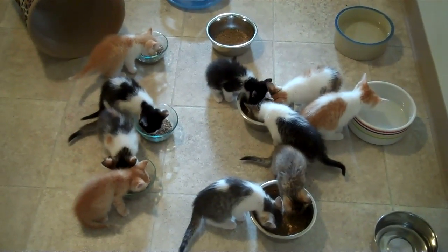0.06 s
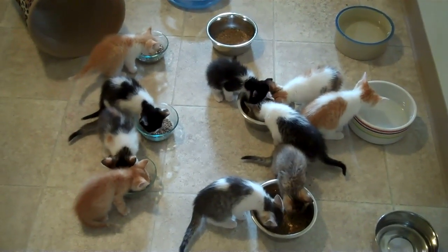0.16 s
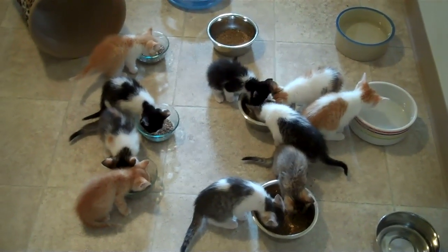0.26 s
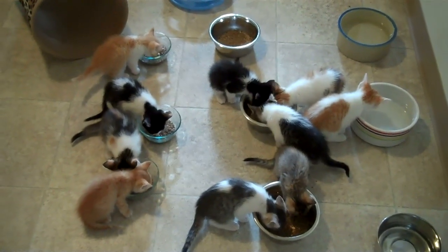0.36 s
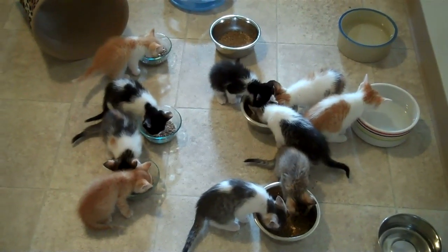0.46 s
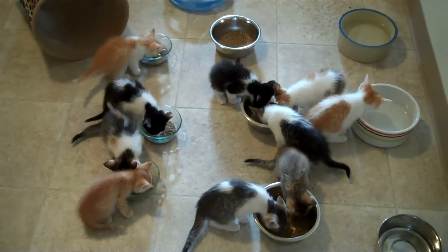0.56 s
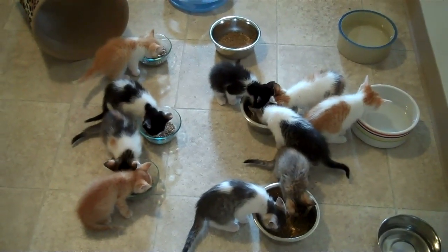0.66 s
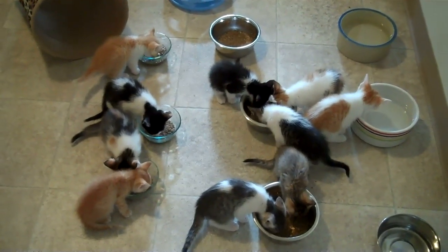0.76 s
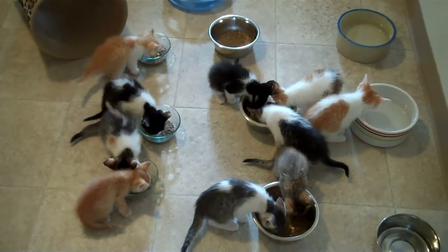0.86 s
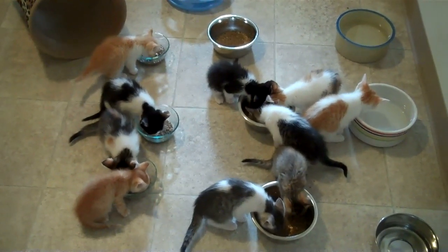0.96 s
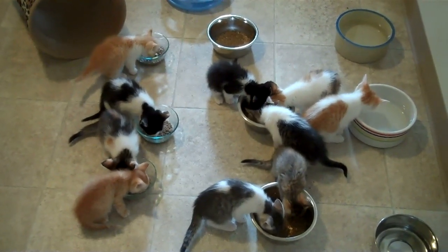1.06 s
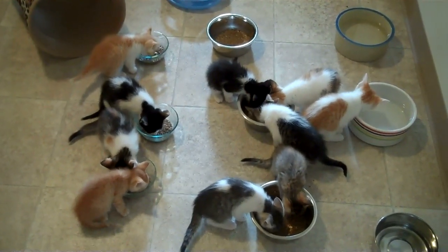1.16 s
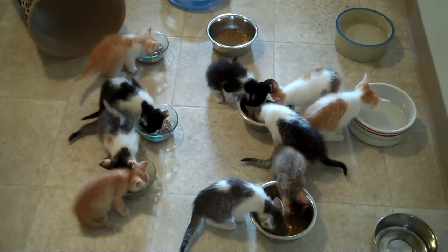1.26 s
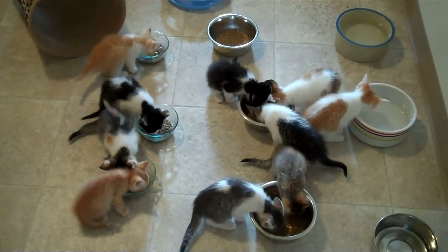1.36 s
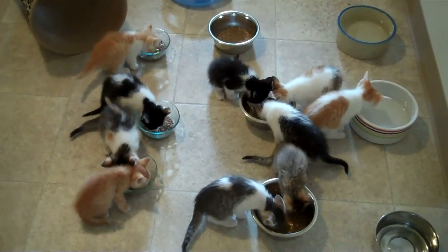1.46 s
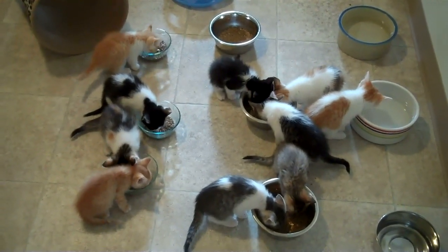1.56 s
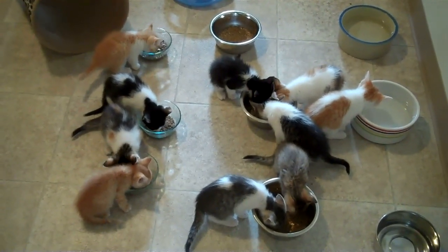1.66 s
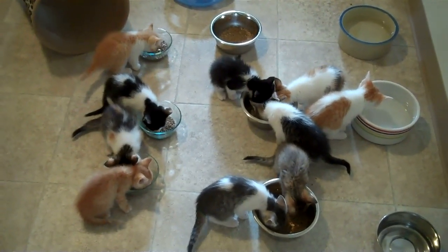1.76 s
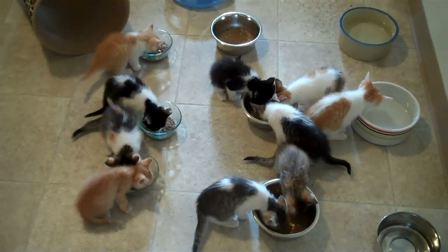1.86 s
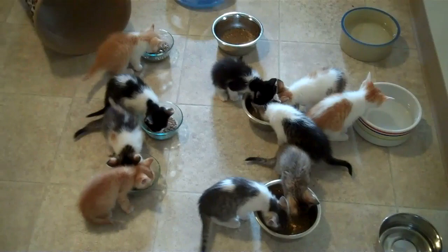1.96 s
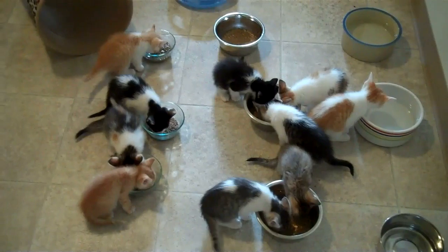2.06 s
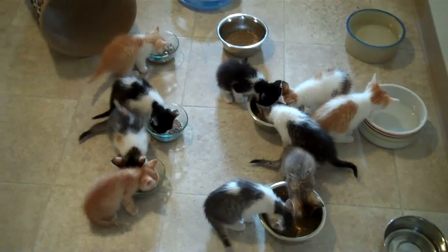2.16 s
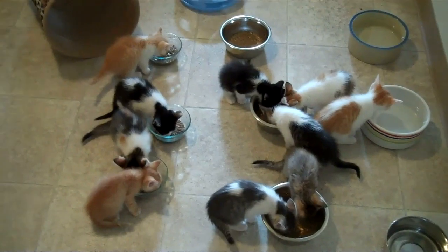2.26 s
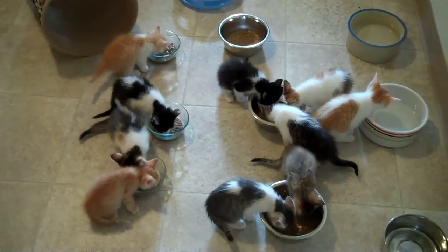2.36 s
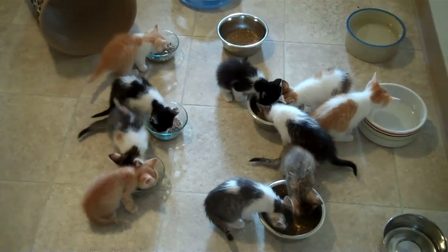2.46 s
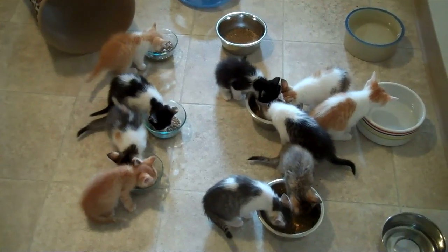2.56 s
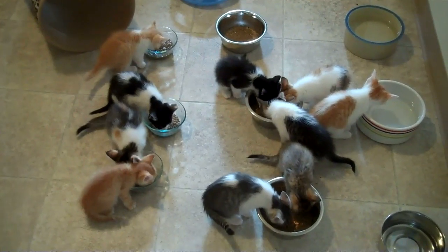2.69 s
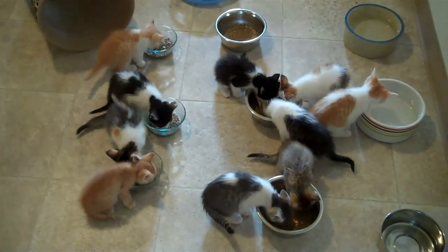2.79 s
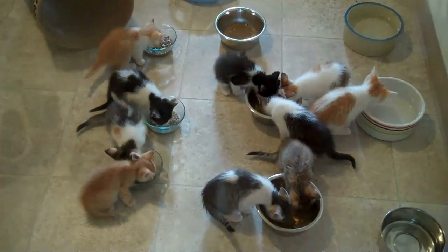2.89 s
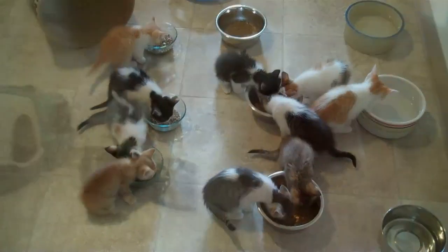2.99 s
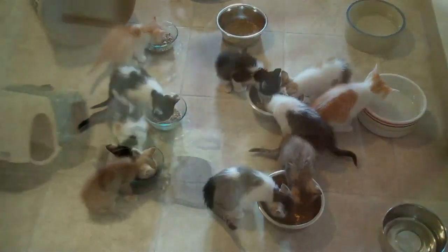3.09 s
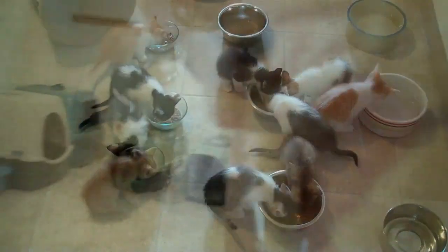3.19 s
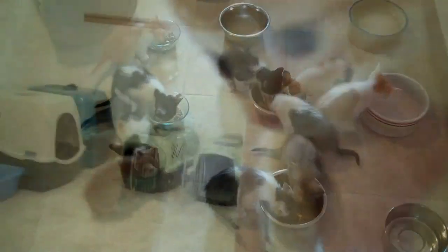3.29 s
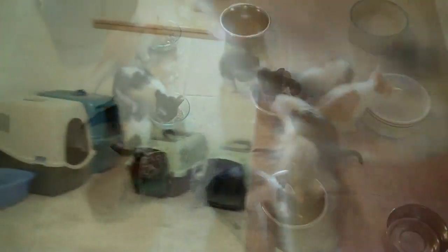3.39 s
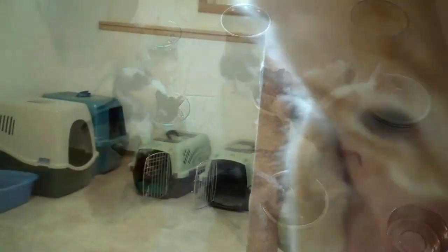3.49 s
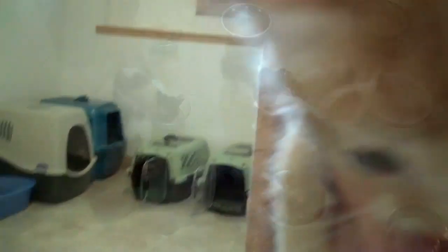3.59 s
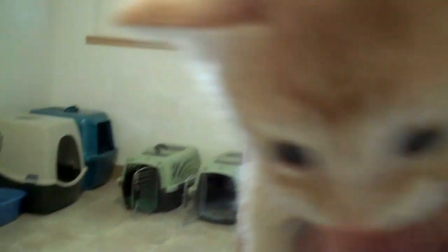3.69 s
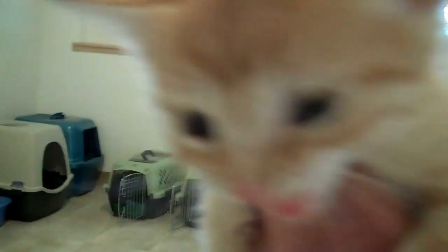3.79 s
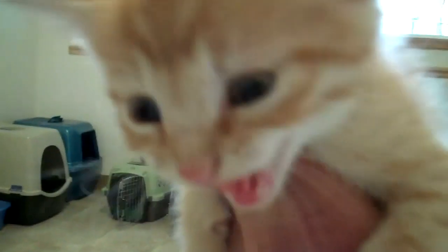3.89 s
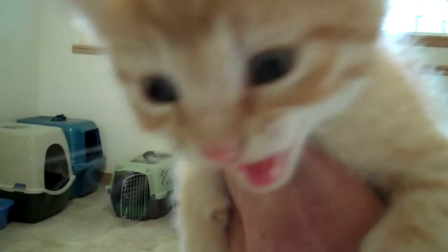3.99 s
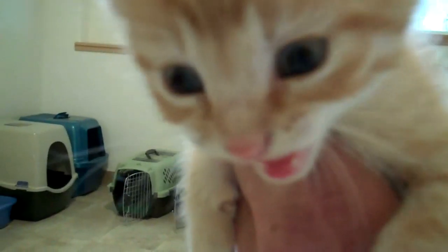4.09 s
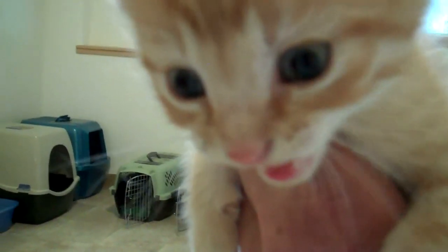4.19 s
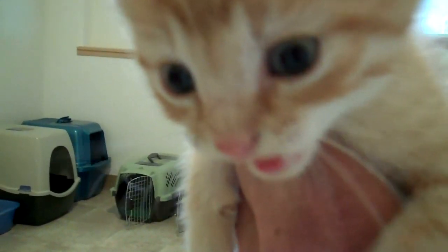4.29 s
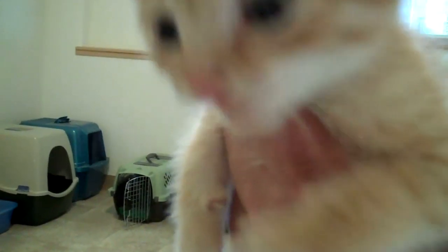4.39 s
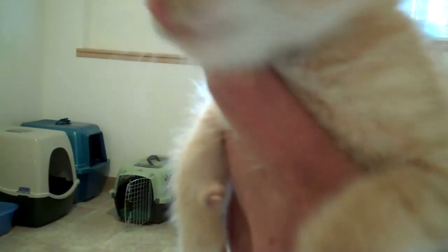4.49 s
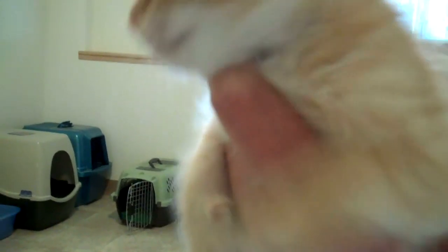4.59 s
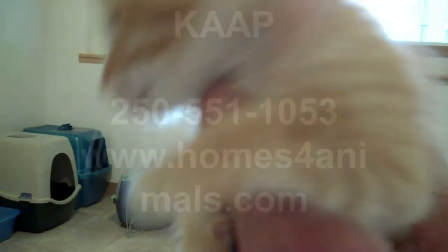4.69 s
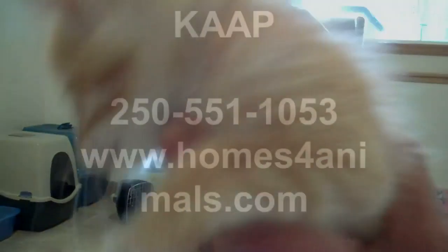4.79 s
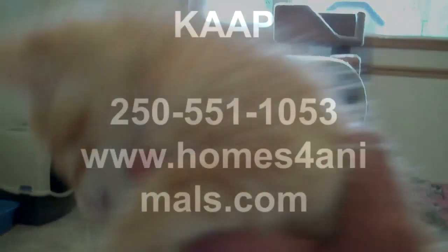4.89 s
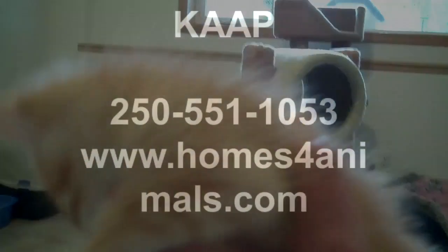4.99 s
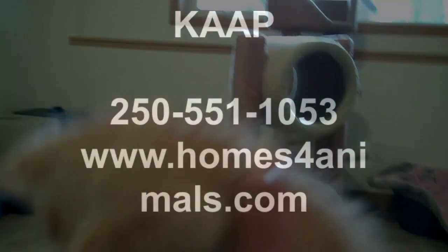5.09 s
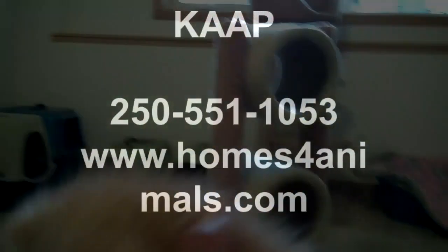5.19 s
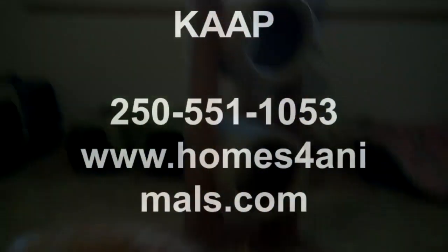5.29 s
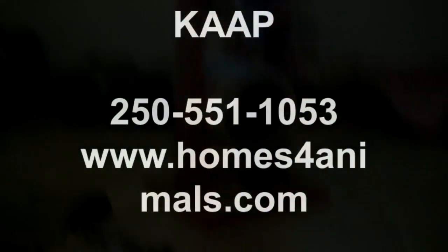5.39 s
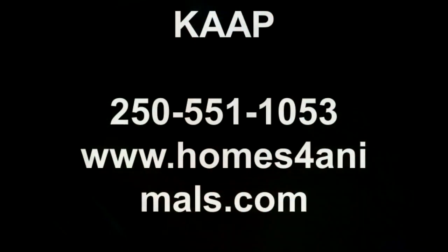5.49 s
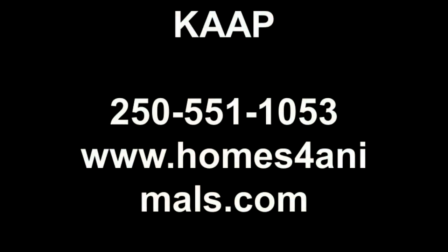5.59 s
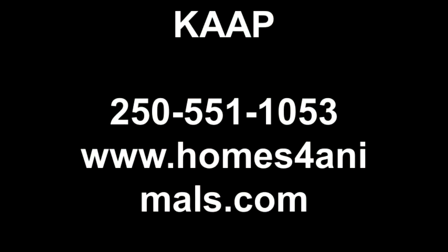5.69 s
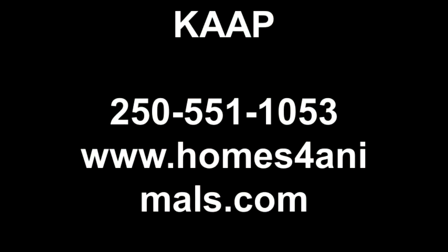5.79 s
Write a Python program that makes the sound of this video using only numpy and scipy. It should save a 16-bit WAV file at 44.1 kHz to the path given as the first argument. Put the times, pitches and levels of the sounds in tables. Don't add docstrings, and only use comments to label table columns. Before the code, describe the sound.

Several kittens crunch dry food from bowls in a tiled room, then one close kitten gives a shrill meow before everything fades out.

```python
import sys
import numpy as np
from scipy import signal
from scipy.fft import rfft, irfft, next_fast_len
from scipy.io import wavfile
from scipy.ndimage import uniform_filter1d, map_coordinates

SR = 44100
rng = np.random.default_rng(int(sys.argv[2]) if len(sys.argv) > 2 else 0)


def gain_from_db(level_db):
    decades = np.asarray(level_db, float) / 20
    return 10 ** decades


def master_out(mix):
    frames = np.transpose(np.atleast_2d(mix))
    ceiling = np.clip(frames, -1, 1)
    pcm = np.round(ceiling * 32767).astype(np.int16)
    wavfile.write(sys.argv[1], SR, pcm)


N = 257984
TIME = np.arange(N) / SR


def unit(x):
    return x / np.sqrt(np.mean(x ** 2) + 1e-20)


def along(points, hz):
    f, v = np.transpose(points)
    return np.interp(np.log(hz + 1), np.log(f + 1), v)


def curves(rows):
    s, *cols = np.transpose(rows)
    return [np.interp(TIME, s, c) for c in cols]


def gate(rows, edge_s):
    return np.clip(np.minimum(TIME - rows[0][0], rows[-1][0] - TIME) / edge_s, 0, 1)


def wobble(rate_hz, size=N):
    knots = rng.standard_normal(int(size * rate_hz / SR) + 4)
    return map_coordinates(knots, [TIME[:size] * rate_hz])


def filtered(x, response):
    m = next_fast_len(N + SR // 2)
    return irfft(rfft(x, m) * response(np.fft.rfftfreq(m, 1 / SR)), m)[..., :N]


def coloured(x, spectrum):
    return filtered(x, lambda hz: gain_from_db(along(spectrum, hz)))


def sides(left_db):
    return gain_from_db(left_db / 2 * np.array([[1], [-1]]))


def snap(hz, low_db, t60_s, sharp):
    t = np.arange(SR // 20) / SR
    noise = rng.standard_normal((2, len(t))) * gain_from_db(-60 * t / t60_s)
    noise[:, 0] += 2.5
    b, a = signal.iirpeak(hz, sharp, SR)
    high = signal.lfilter(b, a, signal.lfilter(b, a, noise[0]))
    dull = signal.butter(2, [1100, 3800], "band", fs=SR)
    low = signal.lfilter(*dull, noise[1])
    return high / abs(high).max() + gain_from_db(low_db) * low / abs(low).max()


def meow():
    # time in seconds, pitch in Hz, effort in dB, mouth opening in dB.
    humming = [
        (3.79, 581, -46.5, -10),
        (3.818, 601, -46.5, -9),
        (3.84, 695, -43.5, -7),
        (3.872, 708.6, -43.5, -2.5),
        (3.884, 774, -43.5, -2.5),
        (3.898, 930, -38, -1.5),
        (3.916, 1104, -35, 2),
        (3.934, 1188, -36.5, -0.5),
    ]
    cry = [
        (3.935, 1192, -41.5, 24.8),
        (3.96, 1210, -42, 33),
        (4.03, 1229, -44, 32.45),
        (4.171, 1215, -36, 22.2),
        (4.251, 1170, -34, 18.2),
        (4.323, 1164, -33.5, 16.3),
        (4.371, 1136, -32.5, 15.8),
        (4.45, 1117, -33, 14.8),
        (4.51, 1027, -33, 9),
    ]
    closing = [
        (4.53, 934, -38, 7),
        (4.545, 690, -43, 8),
        (4.555, 746, -42.5, -15),
        (4.568, 1127, -35, -25),
    ]
    opens = (3.935, 0.84)
    # frequency in Hz, level in dB.
    throat_spectrum = [(1220, 10), (1400, -3), (1800, -2.5), (1950, -9.5), (2150, -14.5), (2300, -13.5),
                       (2450, -4.5), (3300, 0), (3750, 0.5), (4000, -7)]
    mouth_spectrum = [(4000, -15.5), (4500, -31.5), (4900, -13.5), (5350, -13.5), (5750, 1.5), (6100, -0.5),
                      (6800, -5.5), (7300, -1.5), (8300, -11.5), (9200, -10.5), (9800, -22.5), (10700, -28),
                      (12200, -43), (13500, -63)]
    # frequency in Hz, density in dB per Hz.
    rasp_spectrum = [(4400, -71.5), (4800, -19), (5600, -4.5), (6600, 2.5), (8000, -2.5), (8800, -12),
                     (10000, -21), (11500, -45), (13000, -69)]
    hum_spectrum = [(400, -27), (1100, -8.5), (1800, -8), (3000, -7), (4000, -11.5), (5000, -28),
                    (6000, -11), (7600, -2.5), (8600, -4.5), (10000, -30.5), (12000, -60.5)]
    # time in seconds, extra rasp in dB.
    catches = [
        (3.956, 6),
        (3.98, 5),
        (4.03, 9),
        (4.062, 7),
        (4.15, 8),
        (4.172, 7),
        (4.21, 9),
        (4.29, 5),
        (4.375, 7),
        (4.415, 5),
    ]
    # start in seconds, full in seconds, depth in cycles.
    tremble = (4.47, 4.53, .045)
    # time in seconds, spread in seconds, depth.
    doubling = (3.946, .005, 0.28)
    taut_hz, slack_hz = 1010, 690

    rows = humming + cry + closing
    calling = slice(round(3.7 * SR), round(4.6 * SR))
    pitch_hz, chest_db, open_db = (c[calling] for c in curves(rows))
    time, n = TIME[calling], len(pitch_hz)
    shut = time < opens[0]
    slack = np.clip((taut_hz - pitch_hz) / (taut_hz - slack_hz), 0, 1) * np.where(shut, 1, 0.62)
    rasp_db = -19 + 17 * slack
    mouth_db = chest_db + open_db
    throat_db = chest_db - 4 + 0.34 * np.clip(open_db, 0, None) - 7 * slack

    cycles = np.cumsum(pitch_hz) / SR + .007 * wobble(90, size=n)
    cycles += .04 * gain_from_db(rasp_db) * wobble(250, size=n)
    cycles += tremble[2] * np.interp(time, tremble[:2], [0, 1]) * wobble(110, size=n)

    stretch = np.where(shut, opens[1], 1)
    narrowing_db = np.clip(17.5 - open_db, 0, None)
    voice = gain_from_db(chest_db + 1.5) * np.sin(2 * np.pi * cycles)
    for k in range(2, 19):
        hz = k * pitch_hz
        dulling_db = 0.39 * narrowing_db * np.clip(hz / 1000 - 7.6, 0, None)
        high_db = mouth_db - 25 * gain_from_db(rasp_db) - dulling_db + along(mouth_spectrum, hz / stretch)
        middle_db = throat_db + along(throat_spectrum, hz)
        level_db = uniform_filter1d(np.where(hz > 4000, high_db, middle_db), size=20)
        level_db = level_db + 2.5 + 0.36 * wobble(120, size=n)
        voice += gain_from_db(level_db) * np.sin(2 * np.pi * k * cycles + 1.1 * k)
    doubled = np.exp(-((time - doubling[0]) / doubling[1]) ** 2 / 2)
    voice *= 1 + doubling[2] * doubled * np.sin(np.pi * cycles)

    catch_s = .008
    leak_db = sum(db * np.exp(-((time - s) / catch_s) ** 2 / 2) for s, db in catches)
    puffs = (1 + np.sin(2 * np.pi * cycles)) ** 1.5
    hiss = unit(coloured(puffs * rng.standard_normal(n), rasp_spectrum)[:n])
    throat_hiss = unit(coloured(puffs * rng.standard_normal(n), hum_spectrum)[:n])
    mouth_air = gain_from_db(mouth_db + rasp_db + leak_db) * hiss
    throat_air = gain_from_db(chest_db + 1.155 * rasp_db - 2.5) * throat_hiss
    out = np.zeros(N)
    out[calling] = voice + mouth_air + throat_air
    return gate(rows, 0.0019) * out


def lips():
    # start in seconds, peak in dB, pitch in Hz, low part in dB, t60 in seconds.
    smacks = [(3.75, -40.5, 7700, -8.5, 0.01976), (3.752, -46, 3000, -8.5, .015),
              (3.753, -42.5, 1060, -7, 0.024), (3.7695, -50, 4300, -3, .004),
              (3.8124, -33.5, 4500, -16, 0.0053), (3.769, -41, 7700, -16.5, 0.007),
              (3.778, -43, 8300, -19.5, .005), (3.7925, -41, 7600, -5, 0.0438),
              (3.81, -29, 8100, -25, .012), (3.8129, -16.5, 7200, -28, 0.006),
              (3.8121, -17, 8400, -25, 0.004), (3.819, -35, 7800, -20, 0.006), (4.6, -40.5, 6550, 6, .006),
              (4.58, -38, 7500, -24, .07), (4.575, -33, 8500, -15, 0.016)]
    out = np.zeros(N + SR)
    for s, db, hz, low_db, t60_s in smacks:
        out[round(s * SR):][:SR // 20] += gain_from_db(db + 5.5) * snap(hz, low_db, t60_s, 5.2)
    return out[:N]


def breath():
    # time in seconds, level in dB.
    breath_levels = [
        (4.54, -48),
        (4.56, -46),
        (4.586, -42),
        (4.61, -53),
        (4.726, -67),
        (4.782, -55),
        (5.066, -77),
        (5.1, -74.5),
    ]
    # frequency in Hz, density in dB per Hz.
    air_spectrum = [(290, -52), (500, -25.5), (1100, -6), (1300, -13), (2040, -12), (2240, -5), (2940, -17),
                    (3710, -16), (7540, 3.5), (13000, -26)]
    air = unit(coloured(rng.standard_normal(N), air_spectrum))
    return gate(breath_levels, 0.015) * gain_from_db(curves(breath_levels)[0] + 1.1 * wobble(57)) * air


def mews():
    # time in seconds, pitch in Hz, level in dB.
    mew_curves = [
        [(2.9, 1260, -71), (2.96, 1285, -67), (3.05, 1283, -73), (3.14, 1286, -82)],
        [(4.74, 886, -77), (4.8, 981, -66.5), (4.85, 988, -60), (4.9, 971, -63), (4.96, 976.5, -61),
         (5.03, 990, -71), (5.15, 971, -77)],
    ]
    # level of each overtone in dB, last the extra fall per overtone in dB/s.
    mew_overtones = [
        (5, -20, -25, 0),
        (2, -2, 5, -14, -14, 0, -4, 75),
    ]
    out = np.zeros(N)
    for rows, (*overtones_db, fall_db) in zip(mew_curves, mew_overtones):
        pitch_hz, db = curves(rows)
        cycles = np.cumsum(pitch_hz) / SR + 0.18 * wobble(85)
        age_s = np.clip(TIME - rows[3][0], 0, 1)
        tone = np.zeros(N)
        for k, overtone_db in enumerate(overtones_db):
            level_db = overtone_db - k * fall_db * age_s + 3.5 * wobble(40)
            tone += gain_from_db(level_db) * np.sin(2 * np.pi * (k + 1) * cycles)
        out += gate(rows, 0.011) * gain_from_db(db - 3.5) * tone
    return out


def bites():
    # start in seconds, peak in dB, pitch in Hz, low part in dB.
    bite_events = [(.108, -37, 6030, -7), (.159, -45, 5800, -20), (0.2391, -36.5, 5660, -3.5),
                   (0.3141, -35, 8000, -4), (.3396, -38, 5800, -2.5), (0.4677, -29, 6860, -13),
                   (0.62, -37, 7800, -30), (0.7239, -28.5, 6700, -7.5), (0.8326, -35, 7300, -8),
                   (0.914, -40.5, 5770, 2), (0.977, -36.5, 8100, -7.5), (0.987, -35, 5600, -13),
                   (1.1487, -33.5, 4670, -4), (1.2161, -43, 7800, -4), (1.3115, -33, 6230, -28),
                   (1.3915, -43, 7800, -7), (1.438, -40, 5960, 2), (1.5036, -34, 7600, -4.5),
                   (1.624, -48, 6140, -21), (1.7283, -34, 6500, -2.5), (1.892, -41, 8200, -12),
                   (2.0104, -39, 6860, -4), (2.037, -32.5, 7000, -10), (2.14, -22, 8300, -19.5),
                   (2.2538, -33, 6760, -8), (2.493, -41.5, 7340, -2), (2.6738, -33.5, 8400, -30),
                   (2.883, -36.5, 7100, -8), (3.024, -45, 6030, -17), (3.406, -43, 5730, -30)]
    crumble_s, middle_hz, left_db_per_khz = .043, 6300, 16
    out = np.zeros((2, N + SR))
    for s, db, hz, low_db in bite_events:
        pan = sides(np.clip(left_db_per_khz * (hz - middle_hz) / 1000, -4.5, 9))
        for late, pitch, size in rng.random((8, 3)):
            crumb = snap(hz * (0.887 + .26 * pitch), low_db + 4.0, 0.013, 2.8)
            gain = gain_from_db(db - 13.5 - 9.8 * late - 3.4 * size)
            out[:, round((s + late * crumble_s) * SR):][:, :SR // 20] += gain * pan * crumb
    return out[:, :N]


def ticks():
    # start in seconds, peak in dB, pitch in Hz, left-right in dB.
    tick_events = [(0.0258, -46.5, 4140, 3.5), (0.0352, -46, 6960, 3.5), (0.0813, -46, 4850, -4),
                   (0.108, -44, 6270, 1.0), (0.159, -56, 6770, -1.5), (0.159, -40.5, 5980, 2.0),
                   (0.2039, -48, 7470, 6), (0.2404, -40, 5700, -3), (0.2728, -41.5, 5540, 2.5),
                   (0.3137, -43, 8000, 6), (0.3399, -43, 5700, 1.5), (0.415, -49, 5450, 2.0),
                   (0.4661, -40, 5300, 6), (0.4668, -37.5, 7400, 5.0), (0.5726, -50, 5190, 2.0),
                   (0.619, -36, 7820, 7), (0.717, -41, 7740, 6.5), (0.7247, -48, 2980, 6),
                   (0.7245, -41, 6830, 4.5), (0.8315, -42, 7400, 9), (0.8692, -41, 6230, 1),
                   (0.914, -41.5, 5760, 1.5), (0.978, -48, 7300, 8.5), (0.977, -41, 7940, 11),
                   (0.9866, -39, 5740, 2.0), (1.0545, -49, 4870, -1), (1.0803, -46, 7680, 8),
                   (1.1483, -41, 4450, -0.5), (1.216, -38, 8000, 10), (1.268, -45, 7400, 6),
                   (1.3104, -39, 6240, 1.5), (1.3339, -44, 5870, -2), (1.391, -47, 8050, 6),
                   (1.4386, -38, 6270, 3),
                   (1.4384, -44, 6270, 1.0), (1.5032, -36, 7600, 8), (1.5945, -47, 5900, 0.5),
                   (1.6248, -39.5, 6360, 1.5), (1.6668, -45, 6190, 1.5), (1.7273, -40, 7100, 7),
                   (1.8078, -43.5, 7340, 1.5), (1.8904, -44.5, 8170, 12), (1.9936, -51, 5440, -2),
                   (2.0106, -42, 7250, 2.5), (2.036, -40, 7140, 7), (2.1118, -47, 5890, 5.0),
                   (2.1386, -30.5, 8400, 11), (2.2542, -37.5, 7340, 7), (2.3598, -46, 7220, 7),
                   (2.366, -47.5, 7670, 4.5), (2.4156, -50, 7900, 4.5), (2.4278, -45, 5950, -1),
                   (2.477, -50, 7820, 4.5), (2.491, -44, 7590, 4.5), (2.5219, -47, 6960, 5),
                   (2.5793, -47, 7690, 4.0), (2.6726, -45, 7700, 4.5), (2.7279, -44, 4600, 1),
                   (2.8242, -43, 4560, 0), (2.884, -44, 7250, 4.0), (2.915, -45, 4770, 0),
                   (2.9745, -51, 6160, 1), (3.0233, -43, 5480, 3), (3.0736, -52, 6560, 1.0),
                   (3.0938, -43.5, 6500, -0.5), (3.1917, -45, 7700, 6), (3.2845, -54, 7950, 6),
                   (3.3225, -47.5, 7262, 4), (3.4073, -41.5, 5660, -2), (3.4697, -46.5, 7360, 6)]
    lag_s = .001
    out = np.zeros((2, N + SR))
    for s, db, hz, pan_db in tick_events:
        tick = sides(np.clip(pan_db, -9, 9)) * snap(hz, -8.5, 0.0094, 3.2)
        out[:, round((s + lag_s) * SR):][:, :SR // 20] += gain_from_db(db - 3.0) * tick
    return out[:, :N]


def knocks():
    # start in seconds, peak in dB, pitch in Hz, t60 in seconds, tick in dB.
    knock_events = [(.338, -51.5, 1200, 0.05, -6), (.352, -53, 1050, .06, -8), (.366, -53, 1000, .05, -8),
                    (1.15, -51, 2500, 0.035, -22), (1.15, -49, 4840, 0.074, -15),
                    (1.4396, -37.5, 2450, 0.017, -15.5), (1.446, -48, 2290, .03, -12),
                    (1.453, -52, 2350, 0.03, -13), (1.464, -52, 2300, 0.034, -15),
                    (2.155, -47.5, 3210, 0.027, -17), (2.707, -51.5, 1555, 0.037, -4),
                    (2.485, -58, 993, 0.07, 3), (2.483, -60, 2600, .03, 3), (2.54, -57, 1240, .05, 3),
                    (2.545, -56, 1900, .05, -6), (2.57, -59, 1135, 0.082, -5), (2.6, -62, 1056, .1, -10),
                    (2.72, -56, 1975, .07, -5), (2.76, -62, 1090, 0.13, -8), (2.8, -59, 1106, .12, -8),
                    (2.85, -64, 980, 0.072, -8), (4.755, -61.5, 807, .25, -15), (2.55, -57.5, 998, 0.11, 0),
                    (2.729, -58.5, 1120, 0.1, 7), (3.341, -58.5, 413, 0.31, -7),
                    (3.483, -55.5, 690, 0.026, -18), (3.511, -52, 1076, 0.028, -8),
                    (3.686, -55.5, 300, 0.025, -9), (5.2186, -45, 1200, 0.006, -25),
                    (5.2187, -46, 2600, 0.004, -25), (5.2236, -58, 1002, 0.0078, -15),
                    (5.455, -58.5, 1990, 0.005, -15)]
    out, t = np.zeros(N + SR), np.arange(SR // 4) / SR
    for s, db, hz, t60_s, tick_db in knock_events:
        noise = uniform_filter1d(rng.standard_normal(len(t)), size=6)
        tick = gain_from_db(tick_db + 7.5 - 60 * t / 0.013) * noise
        waver_rad = np.clip(hz / 500 - .5, 0, 2.2) * wobble(200, size=len(t))
        ring = gain_from_db(-60 * t / t60_s) * np.sin(2 * np.pi * hz * t + waver_rad)
        out[round(s * SR):][:len(t)] += gain_from_db(db) * (ring + tick)
    return out[:N]


def spread(pair, spectrum):
    # frequency in Hz, likeness of the ports.
    likeness = [(60, 0.25), (180, -0.27), (540, 0.2), (1630, 0.315), (4880, 0.33), (14700, -0.37)]
    # frequency in Hz, left-right in dB.
    lean_db = [(60, 2.2), (130, 2.5), (290, 1.9), (630, 1.7), (1390, 2.8), (3050, 0.5), (6690, 2.9),
               (14700, 1.5)]

    def mix(hz):
        angle = np.arccos(np.clip(along(likeness, hz), -1, 1)) / 2
        return gain_from_db(along(spectrum, hz)) * [np.cos(angle), np.sin(angle)]

    def tilt(hz):
        delay = np.exp(-1j * np.pi * hz * 4e-5 * [[1], [-1]])
        return gain_from_db(along(lean_db, hz) / 2 * [[1], [-1]]) * delay

    mid, side = filtered(pair, mix)
    both = filtered(np.array([mid + side, mid - side]), tilt)
    return both / np.sqrt(np.mean(both.mean(axis=0) ** 2))


def chewing():
    # time in seconds, level in dB.
    chew_levels = [(0, -53.5), (.54, -56.5), (.89, -53.5), (1.83, -58.5), (2.27, -52), (2.78, -53),
                   (3.44, -68), (3.72, -65.5), (3.95, -78), (4.45, -78), (4.72, -59)]
    # frequency in Hz, density in dB per Hz.
    grit_spectrum = [(410, -37.5), (700, -19.5), (1020, -5), (1580, -21.5), (2430, 3), (2860, 6.5),
                     (3980, 7), (7990, 12), (10400, 0), (13600, -16.5), (14500, -23)]
    chew_db, = curves(chew_levels)
    grain_db = np.clip(6 * np.array([wobble(490), wobble(460)]), -18, 12)
    grains = rng.standard_normal((2, N)) * gain_from_db(grain_db)
    z = signal.stft(grains, nperseg=256)[2]
    field = uniform_filter1d(rng.standard_normal(z.shape[1:]), size=9, axis=0)
    field = uniform_filter1d(field, size=9, axis=1)
    patch_db = np.clip(7.1 * unit(field), -12, 9)
    patchy = signal.istft(z * gain_from_db(patch_db), nperseg=256)[1][:, :N]
    return gain_from_db(chew_db - 11) * spread(patchy, grit_spectrum)


def hush():
    # frequency in Hz, density in dB per Hz.
    hush_spectrum = [(12, -40), (20, -3), (49, -7), (87, -2), (147, -4), (286, 0), (540, -3.5),
                     (1020, -1.5), (1420, -6.5), (2410, -6.5), (3460, -9), (7510, -6.5), (9110, -15),
                     (13800, -15), (15000, -41)]
    return gain_from_db(-62.5) * spread(rng.standard_normal((2, N)), hush_spectrum)


def background():
    # start in seconds, end in seconds.
    fade_s = (4.75, 5.76)
    fade = np.clip((fade_s[1] - TIME) / (fade_s[1] - fade_s[0]), 0, 1) ** 1.09
    return (hush() + chewing()) * fade


def tiles(x, decays):
    hz, t, z = signal.stft(rng.standard_normal((2, SR // 2)), SR, nperseg=256)
    dying = z * gain_from_db(-60 * t / along(decays, hz)[:, None])
    tail = signal.istft(dying, SR, nperseg=256)[1]
    delayed = np.pad(x, (300, 0))[None]
    return signal.fftconvolve(delayed, tail / np.linalg.norm(tail[0]), axes=1)[:, :N]


def scene():
    # frequency in Hz, level in dB.
    shade = [(1000, 0.5), (4900, 0.5), (6000, 2.5), (7000, -4), (7800, -12.5), (8600, -18), (9600, -21),
             (11000, -26)]
    # frequency in Hz, phase in radians.
    phase_turn = [(1000, 0), (2400, .25), (3500, .4), (4800, .75), (5900, .6), (6800, .1), (7300, 0),
                  (8400, .6), (9600, 1.8), (11000, 2.2)]
    # frequency in Hz, level in dB.
    port = [(100, -4), (8500, 2.5), (10000, -11), (14000, 12)]
    # frequency in Hz, t60 in seconds.
    room_decay = [(300, 0.52), (2000, 0.92), (6000, 0.11), (12000, 0.078)]
    corner_decay = [(300, 0.35), (2000, 0.26), (6000, 0.1), (12000, 0.098)]

    near = meow() + lips() + breath()
    right = filtered(near, lambda hz: gain_from_db(along(shade, hz)) * np.exp(1j * along(phase_turn, hz)))
    eating = coloured(bites() + ticks(), port) + knocks()
    far = mews()
    wet = gain_from_db(-20.0) * tiles(near, room_decay)
    wet += gain_from_db(-3.0) * tiles(eating.mean(axis=0), corner_decay)
    wet += gain_from_db(-6.0) * tiles(far, room_decay)
    loud = uniform_filter1d(near ** 2, size=2000)
    ducked = background() / np.sqrt(1 + np.clip(loud / gain_from_db(-52), 0, 3.5))
    return np.array([near, right]) + eating + far + wet + ducked


def roll_off(x):
    return signal.sosfilt(signal.butter(12, 15270, fs=SR, output="sos"), x)


def record(dry):
    limited = filtered(dry, lambda hz: np.clip((14900 - hz) / 600, 0, 1))
    return roll_off(limited)


dry = scene()
out = record(dry)
master_out(out)
```